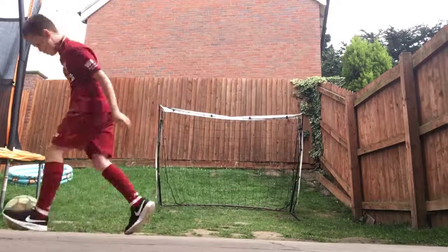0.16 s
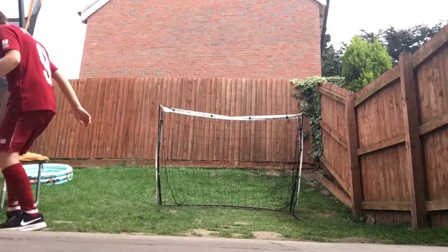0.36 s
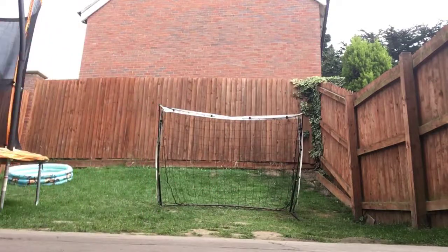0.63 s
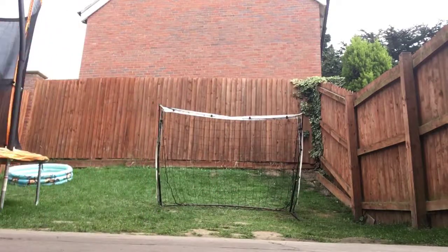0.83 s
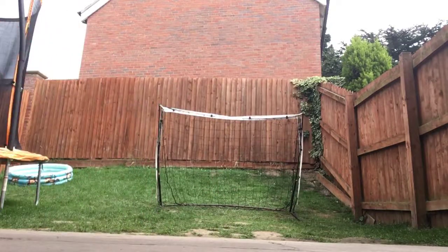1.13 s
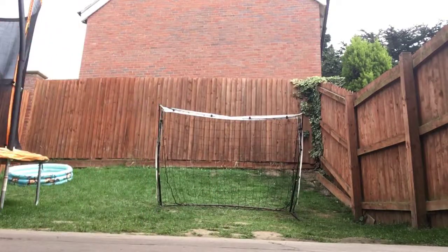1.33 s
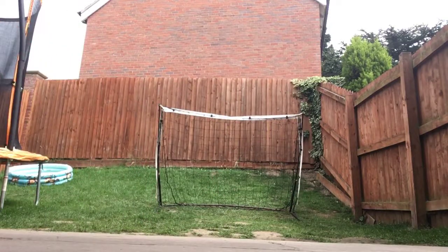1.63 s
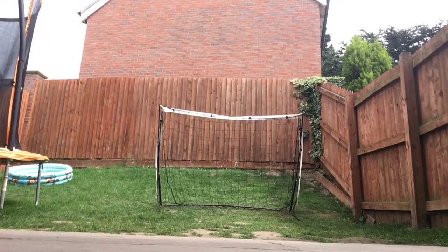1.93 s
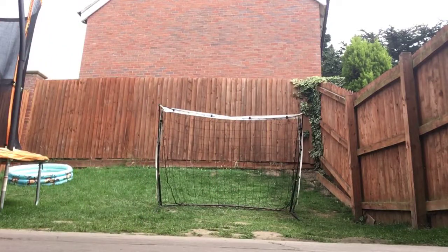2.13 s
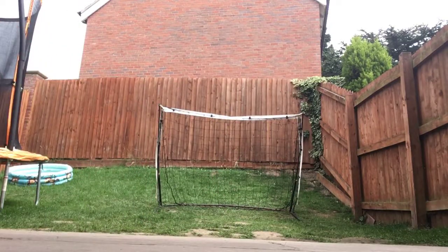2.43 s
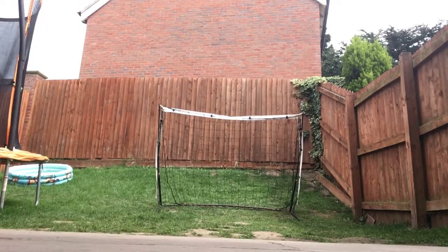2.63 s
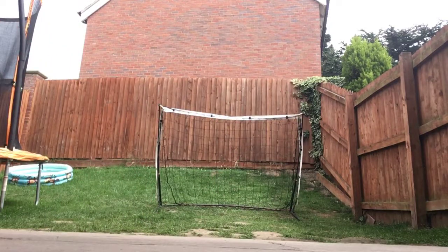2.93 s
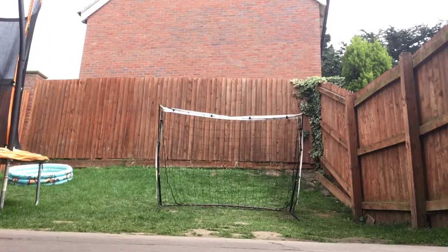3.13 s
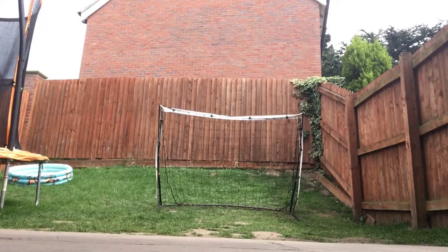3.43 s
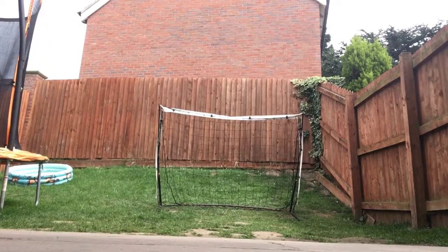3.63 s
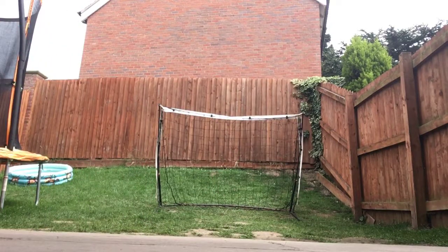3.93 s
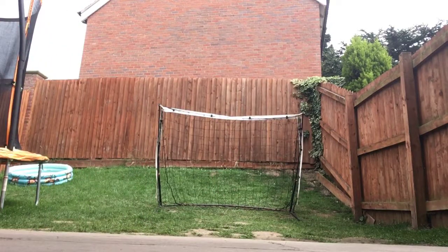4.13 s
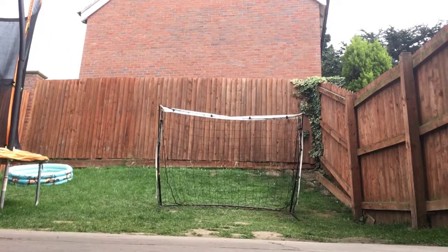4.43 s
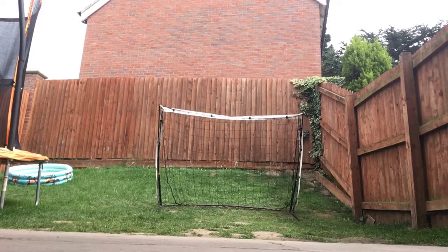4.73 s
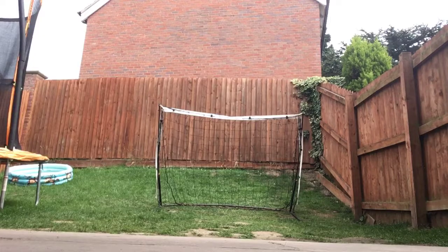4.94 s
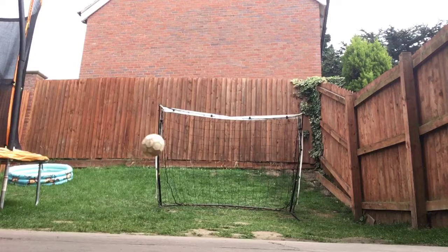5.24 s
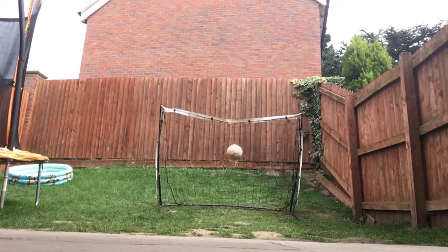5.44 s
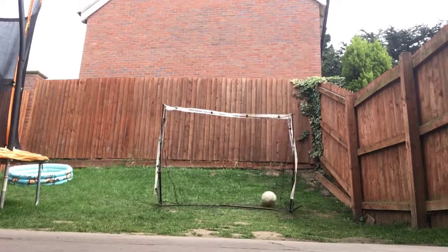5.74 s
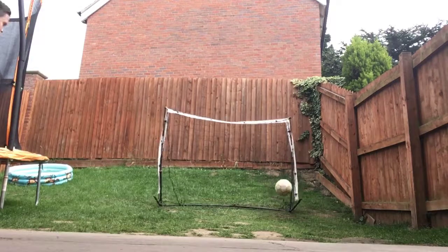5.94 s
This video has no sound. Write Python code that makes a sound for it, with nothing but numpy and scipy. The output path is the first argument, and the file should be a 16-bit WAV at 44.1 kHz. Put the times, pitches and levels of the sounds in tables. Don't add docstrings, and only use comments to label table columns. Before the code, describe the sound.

In a small walled garden a football is touched and kicked in quick thuds, the hardest booming off a wooden fence with rattling boards and a brief metallic jitter. Softer touches follow, then shoes scuff grass and grit while a small bird chips over low far traffic. Finally a sharp, punchy shot cracks out, and the ball hits a net that rustles and settles. One fixed microphone, close to the contacts, short outdoor echoes.

```python
import sys
import numpy as np
from scipy import signal
from scipy.io import wavfile

SR = 44100
rng = np.random.default_rng(int(sys.argv[2]) if len(sys.argv) > 2 else 0)


def pcm_store(signal):
    levels = np.round(np.clip(np.atleast_2d(signal), -1, 1) * 32767)
    wavfile.write(sys.argv[1], SR, levels.astype(np.int16).T)


def level_to_linear(level):
    exponent = np.asarray(level, float) / 20
    return 10 ** exponent


N = 267772

EDGES_HZ = 32 * 2 ** np.arange(0, 9.1, 1 / 3)
CENTRES_HZ = np.sqrt(EDGES_HZ[1:] * EDGES_HZ[:-1])

# start [s], peak level [dB], dent frequency [Hz], ball ring [dB], wall tail [dB].
SLAPS = [(0.5071, -26, 800, 0, 3), (0.5097, -19, 900, 0, -6.5), (.712, -22, 780, -6, -16),
         (.868, -26, 600, 0, -14), (0.9151, -2.5, 880, -10, -10), (.9195, -15, 503, -9, -7),
         (1.3022, -18.5, 770, 5, -11), (1.310, -23, 690, 3, -8), (1.3605, -24, 600, -8, -6),
         (1.8365, -27, 815, 3.5, 2), (5.5205, -20, 720, 2, -12)]
# start [s], peak level [dB], dent frequency [Hz], ball ring [dB], wall tail [dB].
CUSHIONED = [
    (0.6437, -14.5, 560, 10.5, -12),
    (0.6483, -18.5, 484, -4, -8.5),
    (1.7646, -25.5, 514, 2, 4.5),
    (1.7692, -30.5, 464, 7, -1.5),
    (4.9657, -28.5, 384, -2, -3.5),
    (5.122, -26.5, 690, 1, 0),
    (5.1389, -1.5, 570, -11, -10),
    (5.149, -16, 546, -2, -30),
    (5.1583, -18, 480, 2, -6),
]
# start [s], peak level [dB], dent frequency [Hz], ball ring [dB], wall tail [dB].
LANDINGS = [
    (5.864, -29, 705, 4, 0.5),
    (5.8736, -15, 530, -16, -12),
    (5.995, -39.5, 470, 12, -22),
]
# start [s], peak level [dB], dent frequency [Hz].
REBOUNDS = [
    (.932, -15.5, 950),
    (.959, -20, 756),
    (0.993, -23, 576),
    (1.052, -33, 497),
]
# start [s], peak level [dB], dent frequency [Hz].
TAPS = [
    (0.261, -34, 427),
    (.631, -26, 480),
    (2.458, -39, 900),
    (3.539, -36, 800),
    (5.0055, -35, 800),
    (5.015, -41, 694),
    (5.276, -40, 593),
    (5.788, -33, 900),
]


def contact_rows():
    rows = [(*row, 3.5) for row in SLAPS]
    rows += [(*row, -0.1) for row in CUSHIONED]
    rows += [(*row, -1.5) for row in LANDINGS]
    rows += [(*row, -5, 1.5, 3.5) for row in REBOUNDS]
    rows += [(*row, 2, -7, 5.5) for row in TAPS]
    return rows


CONTACTS = contact_rows()


def rms_one(x):
    return x / np.sqrt(np.mean(x ** 2) + 1e-20)


def at_hz(points, hz):
    table_hz, value = np.transpose(points)
    return np.interp(np.log(hz), np.log(table_hz), value)


def band_pass(x, low_hz, high_hz):
    return signal.sosfilt(signal.butter(2, [low_hz, high_hz], "band", fs=SR, output="sos"), x)


def drift(rate_hz):
    r = np.exp(-80 * np.pi * rate_hz / SR)
    white = rng.standard_normal(N // 40 + 2002)
    slow = signal.lfilter([1], [1, -2 * r, r * r], white)[2000:]
    return np.interp(np.arange(N) / 40, np.arange(len(slow)), rms_one(slow))


def bands(grain_db=0.):
    grain = np.minimum(rng.exponential(1, N), 5)
    white = rng.standard_normal((2, N)) * level_to_linear(grain_db * grain)
    white /= white.std()
    return [band_pass(white[k % 2], low_hz, high_hz)
            for k, (low_hz, high_hz) in enumerate(zip(EDGES_HZ, EDGES_HZ[1:]))]


def narrow(hz, width_hz):
    r = np.exp(-np.pi * width_hz / SR)
    section = [1, 0, -1, 1, -2 * r * np.cos(2 * np.pi * hz / SR), r * r]
    return rms_one(signal.sosfilt([section, section], rng.standard_normal(N)))


def narrow_swells(rows):
    out, t = np.zeros(N), np.arange(N) / SR
    for s, hz, width_hz, db, length_s in rows:
        swell = np.exp(-4 * ((t - s) / length_s) ** 2)
        out += level_to_linear(db) * swell * narrow(hz, width_hz)
    return out


def add(track, s, piece):
    i = round(s * SR)
    track[i:i + len(piece)] += piece[:N - i]


def clicks(seconds, sizes):
    train = np.full(N, 1e-18)
    np.add.at(train, np.round(np.asarray(seconds) * SR).astype(int), sizes)
    return train


def ring(train, hz, t60_s):
    r, w = level_to_linear(-60 / (t60_s * SR)), 2 * np.pi * hz / SR
    return signal.lfilter([0, np.sin(w)], [1, -2 * r * np.cos(w), r * r], train)


def air():
    # time [s], level [dB].
    hum = [(0.0, -47), (0.52, -48), (0.73, -45.5), (0.88, -47.5), (1.11, -49), (1.72, -47.5), (1.96, -48.5),
           (2.3, -47.5), (2.99, -48.5), (3.72, -48), (4.85, -48), (5.07, -48), (5.49, -47), (5.8, -46.5),
           (5.97, -45), (6.07, -49.5)]
    # frequency [Hz], level [dB per Hz].
    colour = [(15, -34), (40, 4.5), (64, 1.5), (164, -4.5), (227, -4.5), (457, -12), (970, -9), (2120, -35),
              (3930, -34), (4870, -52.5), (5430, -37), (7300, -44), (9550, -40), (12800, -50.5),
              (15500, -48)]
    together_db = 0.6 * drift(4)
    wash = np.zeros(N)
    for hz, noise in zip(CENTRES_HZ, bands()):
        flicker_db = (0.3 + 150 / (hz + 80)) * drift(6)
        wash += level_to_linear(at_hz(colour, hz) + together_db + flicker_db) * noise
    s, db = np.transpose(hum)
    level_db = np.interp(np.arange(N) / SR, s, db) + 0.5
    return level_to_linear(level_db) * rms_one(wash)


def far_whistles():
    # centre [s], frequency [Hz], width [Hz], peak level [dB], length [s].
    whistles = [(0.09, 5430, 370, -75, 0.35), (0.402, 5400, 250, -77, 0.39), (0.616, 5500, 200, -83, 0.091),
                (1.44, 5640, 300, -77, 0.27), (4.596, 2630, 350, -66, .02), (5.822, 5660, 200, -64, 0.035),
                (5.85, 5580, 150, -69, 0.09), (4.975, 1500, 140, -66, 0.08), (0.21, 1820, 400, -65.5, 0.23),
                (1.628, 1475, 50, -64, 0.11), (4.656, 1690, 97, -68, 0.13), (4.882, 1740, 130, -60.5, 0.13),
                (2.96, 160, 6.2, -54.5, 0.52)]
    return narrow_swells(whistles)


def bird():
    # first chip [s], chips [count], gap [s].
    chatter = [
        (2.465, 4, .07),
        (2.77, 1, 0),
        (2.88, 8, .082),
        (3.685, 4, .085),
        (4.2, 3, .12),
        (4.52, 3, .258),
    ]
    # frequency [Hz], width [Hz], level [dB].
    voice_bands = [(3950, 650, -73), (5450, 600, -76.5)]
    voice = sum(level_to_linear(db) * narrow(hz, width_hz) for hz, width_hz, db in voice_bands)
    out, t = np.zeros(N), np.arange(SR // 20)
    chip_s = 0.019
    swell = np.exp(-4 * ((t - len(t) / 2) / (chip_s * SR)) ** 2)
    for first_s, count, gap_s in chatter:
        for k in range(count):
            i = round((first_s + k * gap_s) * SR) - len(t) // 2
            strength = level_to_linear(2.6 * rng.standard_normal())
            add(out, i / SR, swell * strength * voice[i + t])
    return out


def net():
    # time [s], level [dB].
    shudder = [
        (5.519, -37.5),
        (5.56, -45.5),
        (5.622, -54),
        (5.645, -44.5),
        (5.848, -54.5),
        (5.873, -42.5),
        (5.904, -58),
        (6.058, -68),
        (6.07, -61),
    ]
    # frequency [Hz], level [dB per Hz].
    colour = [(180, -36), (300, -7), (501, 7.5), (767, 13), (1050, -1), (1180, -34), (1420, -52),
              (1780, -3.5), (9000, -28.5), (11700, -63), (19800, -120)]
    rustle = np.zeros(N)
    for hz, noise in zip(CENTRES_HZ, bands(grain_db=5.5)):
        rustle += level_to_linear(at_hz(colour, hz) + 2.8 * drift(26)) * noise
    s, db = np.transpose(shudder)
    level_db = np.interp(np.arange(N) / SR, s, db, left=-120)
    return level_to_linear(level_db) * rms_one(rustle)


def frame():
    # start [s], level [dB].
    touches = [
        (.932, -41),
        (.9345, -47),
        (0.962, -44),
        (.979, -53),
        (.996, -57),
        (1.003, -63),
    ]
    # frequency [Hz], level [dB], t60 [s].
    modes = [(6330, -15, .04), (7160, -21, 0.03), (8350, 0, .02), (8750, -5, .015), (9220, -9, 0.047),
             (9300, -8, 0.057), (11500, -11, 0.02)]
    s, db = np.transpose(touches)
    out = np.zeros(N)
    for hz, mode_db, t60_s in modes:
        spread_db = 3 * rng.standard_normal(len(s))
        sign = np.sign(rng.standard_normal(len(s)))
        out += ring(clicks(s, level_to_linear(db + mode_db + spread_db) * sign), hz, t60_s)
    return out


def grit():
    # centre [s], frequency [Hz], width [Hz], peak level [dB], length [s].
    songs = [
        (2.003, 4150, 420, -49, .012),
        (2.028, 3350, 300, -51, .02),
        (2.02, 2770, 300, -58, 0.074),
        (2.15, 2850, 250, -55.5, 0.019),
        (2.85, 2200, 900, -60.5, 0.085),
    ]
    return narrow_swells(songs)


def scuffs():
    # start [s], peak level [dB], fall [s], brightness [dB per octave].
    drags = [(.03, -56, 0.015, -0.5), (.1, -58, 0.14, -3), (.258, -55, 0.013, 3.5),
             (.706, -38.5, 0.028, -6), (0.851, -41.5, 0.019, 4), (.860, -38.5, 0.021, -8),
             (1.983, -43, 0.045, 0), (2.06, -55, 0.076, -2), (2.123, -48.5, 0.027, 2.5),
             (2.173, -56.5, 0.012, 9), (2.268, -59, 0.012, 2.5), (2.775, -55.5, 0.078, -2.5),
             (2.815, -51.5, 0.064, -2.5), (3.543, -46, 0.037, 0), (4.839, -52.5, 0.045, 0)]
    # start [s], peak level [dB], fall [s], brightness [dB per octave].
    sole_scuffs = [(0.698, -41, 0.024, 9), (.735, -59, 0.29, 0.5), (1.165, -67, 0.044, 8),
                   (1.301, -39.5, 0.021, 4), (1.355, -53, 0.017, 3), (1.43, -61, 0.088, 2),
                   (1.494, -53.5, 0.0065, 1.5), (1.55, -65.5, 0.087, 6), (2.014, -57, 0.023, 5),
                   (3.02, -61, 0.029, -0.5), (3.258, -56, 0.047, -0.5), (4.021, -57.5, 0.008, 17),
                   (4.024, -53, 0.02, 0.5), (4.128, -41.5, 0.0045, 9.5), (4.132, -46, 0.025, 1),
                   (4.224, -56.5, 0.0077, 1.5), (4.96, -58, 0.017, -1), (5.308, -50, 0.041, 0.5)]
    # start [s], peak level [dB], fall [s], brightness [dB per octave].
    strides = [
        (5.1195, -42.5, 0.0045, 9),
        (5.40, -52, 0.024, 1.5),
        (5.423, -53, 0.039, 0),
        (5.456, -53, 0.0073, 1),
    ]
    # start [s], peak level [dB], fall [s].
    cords = [
        (5.595, -50, 0.082),
        (5.687, -45.5, 0.051),
        (5.745, -55, 0.007),
        (5.785, -47, 0.0054),
        (5.816, -51, 0.0078),
        (5.99, -51, 0.027),
        (6.043, -53.5, 0.021),
    ]
    # frequency [Hz], level [dB per Hz].
    friction = [(180, -46), (300, -1.5), (794, -2.5), (1240, -4), (1870, -14.5), (3400, -12.5),
                (4960, -17.5), (6050, -19.5), (9600, -24), (15500, -47)]
    rubs = []
    for rows, rise_share in [(drags, 0.47), (sole_scuffs, 0.17), (strides, 0.58)]:
        rubs += [(s, db, rise_share * fall_s, fall_s, tilt_db) for s, db, fall_s, tilt_db in rows]
    rubs += [(s, db, 0.0052, fall_s, -3.5) for s, db, fall_s in cords]

    layers, t = np.array(bands(grain_db=4)), np.arange(SR // 3) / SR
    octaves = np.log2(np.maximum(CENTRES_HZ, 1500) / 4000)
    out = np.zeros(N)
    for s, db, rise_s, fall_s, tilt_db in rubs:
        rising = np.sin(np.pi / 2 * t / rise_s) ** 2
        falling = np.exp(-(np.maximum(t - rise_s, 0) / fall_s) ** 1.3)
        swell = np.where(t < rise_s, rising, falling)
        chance_db = 1.8 * rng.standard_normal(len(CENTRES_HZ))
        i = round(s * SR)
        sound = level_to_linear(at_hz(friction, CENTRES_HZ) + chance_db + tilt_db * octaves) @ layers[:, i:i + len(t)]
        add(out, s, level_to_linear(db) * rms_one(sound) * swell[:len(sound)])
    return out


def cracks():
    # start [s], peak level [dB], frequency [Hz], fade [s].
    skin = [(0.5067, -34, 2900, 0.003), (.525, -36.5, 1170, 0.011), (.644, -31.5, 1180, 0.0085),
            (0.9156, -21, 1130, 0.0061), (.932, -40, 8600, 0.003), (1.765, -41, 2100, 0.0059),
            (1.835, -46, 2840, 0.012), (5.138, -27, 4400, 0.003), (5.143, -40, 3870, 0.028),
            (5.144, -33.5, 2130, 0.018), (5.1226, -33, 1200, .008), (5.14, -33.5, 6900, 0.0087),
            (5.519, -35, 3720, 0.0068), (0.505, -42, 960, .006)]
    # start [s], peak level [dB], frequency [Hz].
    ticks = [(0.51, -39, 6760), (.515, -53, 6000), (.630, -55, 3500), (0.644, -47, 4000),
             (.9145, -50, 2800), (.959, -35, 3000), (.962, -52, 8500), (0.995, -37, 2500),
             (.996, -57, 8000), (1.041, -54, 7000), (.939, -45, 3000), (.950, -45, 3500), (.972, -46, 3000),
             (1.003, -50, 5000), (1.015, -52, 5500), (1.020, -55, 5000), (1.030, -51, 4000),
             (1.059, -56, 4500), (1.990, -43, 2900), (2.001, -47, 4200), (2.030, -36, 3400),
             (2.138, -47, 2900), (2.1765, -54, 4370), (1.052, -43, 2480), (1.09, -57, 5000),
             (1.133, -54, 4060), (1.303, -27.5, 9300), (1.359, -43.5, 7000), (4.020, -44, 11000),
             (4.129, -52, 4500), (5.786, -41, 1500), (5.8735, -57, 3000), (5.873, -44, 11000)]
    snaps = [(s, db, hz, 0.34 * hz, fade_s) for s, db, hz, fade_s in skin]
    snaps += [(s, db, hz, 0.56 * hz, 0.00087) for s, db, hz in ticks]
    out, t = np.zeros(N), np.arange(SR // 8) / SR
    for s, db, hz, width_hz, fade_s in snaps:
        low_hz, high_hz = np.clip([hz - width_hz / 2, hz + width_hz / 2], 200, 18000)
        burst = band_pass(rng.standard_normal(len(t)) * np.exp(-t / fade_s), low_hz, high_hz)
        add(out, s, level_to_linear(db) * burst / np.abs(burst).max())
    return out


def rings():
    # start [s], peak level [dB], frequency [Hz], t60 [s].
    modes = [(0.5066, -17, 2900, 0.007), (0.5088, -20.5, 2440, .009), (0.5073, -14.5, 1000, 0.03),
             (.512, -43.5, 1920, .09), (.516, -29, 560, .08), (.644, -29, 378, 0.12),
             (0.9164, -20, 1222, 0.043), (.9165, -15, 315, 0.035), (.958, -21.5, 273, 0.29),
             (0.959, -21.5, 148.6, 0.41), (.962, -29, 438, 0.19), (.975, -36, 610, 0.12),
             (1.766, -26.5, 261, .1), (1.768, -34, 426, .1), (1.775, -37, 600, .12), (1.823, -25, 188, .08),
             (1.362, -32, 680, 0.09), (1.311, -31, 740, .07), (5.522, -28, 720, .1), (5.70, -37, 760, .06),
             (5.884, -27.5, 149, .12), (5.8746, -27, 1000, .014), (5.7873, -34, 1000, .03),
             (5.0055, -37, 900, .025), (5.175, -26.5, 209, .25), (5.208, -33, 622, .12),
             (5.232, -34.5, 446, .12), (5.5195, -39, 2300, .02), (0.507, -27, 311, 0.07),
             (.9315, -30, 2310, .015), (.9495, -35, 2000, .015), (0.9583, -29, 1780, .02),
             (0.9937, -36, 2600, .015), (5.876, -29, 302, .08), (5.1378, -9.5, 3800, .0055),
             (5.1387, -19, 3300, .007), (5.139, -17, 1120, .018), (5.150, -28, 410, 0.12),
             (5.1495, -19, 600, .05), (5.158, -17, 640, 0.04), (5.171, -23, 630, .05),
             (5.18, -27, 400, .06), (5.197, -27, 190, .06), (5.21, -26, 170, .05), (5.168, -39, 795, .1),
             (5.198, -35, 592, 0.17), (5.274, -38.5, 653, .06)]
    out, t = np.zeros(N), np.arange(SR // 3) / SR
    for s, db, hz, t60_s in modes:
        swell = 1 - np.exp(-t * hz / 0.8)
        add(out, s, level_to_linear(db - 60 * t / t60_s) * swell * np.sin(2 * np.pi * hz * t))
    return out


def fence_boom():
    centre_s, db, hz, length_s = 0.9463, -6, 106, 0.011
    since_s = np.arange(N) / SR - centre_s
    return level_to_linear(db) * np.exp(-(since_s / length_s) ** 2) * np.cos(2 * np.pi * hz * since_s)


def tails():
    # frequency [Hz], level [dB per Hz].
    echo = [(140, -9.5), (230, -3.5), (289, -7.5), (402, -11), (514, -13), (656, -12), (931, -22.5),
            (1210, -22.5), (1490, -60), (1870, -34), (4110, -52), (4990, -55), (9520, -65.5), (15000, -83)]
    # frequency [Hz], t60 [s].
    echo_t60 = [(60, 0.72), (200, 0.29), (700, 0.28), (2000, 0.17), (5000, 0.2), (12000, 0.033)]
    s, db, _, _, tail_db, tilt_db = np.transpose(CONTACTS)
    out = np.zeros(N)
    for hz, noise in zip(CENTRES_HZ, bands(grain_db=3)):
        bright_db = tilt_db * np.log2(max(hz, 500) / 600)
        power = clicks(s, level_to_linear(2 * (db + tail_db + 15 + at_hz(echo, hz) + bright_db)))
        decay = level_to_linear(-120 / (at_hz(echo_t60, hz) * SR))
        build = np.exp(-1 / (SR * (0.0012 + 0.15 / hz)))
        decaying = signal.lfilter([1], [1, -decay], power)
        out += noise * np.sqrt(signal.lfilter([1 - build], [1, -build], decaying))
    return out


def slaps():
    # frequency [Hz], level [dB], t60 [s].
    ball = [(224, -1.5, 0.055), (314, -15, 0.076), (510, -40, 0.017), (558, -39, 0.015),
            (596, -16.5, 0.066), (1000, -8, 0.018), (1170, -15, 0.082), (1870, -86, 0.025),
            (3000, -41, 0.15)]
    out, t = np.zeros(N), np.arange(SR // 40) / SR
    for s, db, dent_hz, *_ in CONTACTS:
        cycles = t * dent_hz
        add(out, s, -level_to_linear(db + 12) * np.sin(2 * np.pi * cycles) * cycles * np.exp(-cycles / 0.5))
    s, db, dent_hz, ring_db = np.transpose(CONTACTS)[:4]
    for hz, mode_db, t60_s in ball:
        mismatch_db = -14 * np.abs(np.log2(hz / dent_hz))
        spread_db = 5.6 * rng.standard_normal(len(s))
        sign = np.sign(rng.standard_normal(len(s)))
        strength = level_to_linear(db + ring_db + mode_db + mismatch_db - 0.5 + spread_db) * sign
        out += ring(clicks(s + 0.00062, strength), hz, t60_s)
    return out


def pushes():
    # start [s], peak level [dB], frequency [Hz], length [s].
    soft = [(.001, -33.5, 155, 0.0024), (0.412, -47, 92, 0.014), (0.506, -12.5, 95.3, 0.012),
            (.629, -26, 170, .003), (0.659, -27, 69, 0.0088), (0.9646, -21, 100, 0.03),
            (1.1, -37, 108, 0.12), (1.17, -40, 70, .05), (1.7675, -20.5, 135, 0.0077),
            (1.798, -28, 95, 0.0042), (1.801, -18.5, 95.5, 0.0062), (1.816, -24, 105, 0.02),
            (2.28, -35, 93.5, 0.0087), (2.46, -31, 80, 0.0083), (4.549, -37.5, 215, 0.013),
            (4.965, -33.5, 208, 0.0081), (5.192, -40, 95, 0.025)]
    # start [s], peak level [dB], first [Hz], last [Hz], length [s].
    boots = [(.643, -26, 173, 90, .015), (1.300, -24, 76, 55.7, 0.018), (1.3715, -27.5, 78, 25, 0.02),
             (.9135, -17, 100, 70, .011), (.9257, -6, 47, 34, .0126), (.9873, -17, 70, 77, .0147),
             (1.0333, -26, 140, 70, .035), (1.3599, -24, 200, 30, .0055), (5.8623, -22, 97, 36, .0227),
             (5.1373, -5, 108, 40, .0144), (5.1615, -17, 75, 70, .007)]
    # rise in cycles, rumble in dB against the push
    rows = [(s, db, hz, 0.805 * hz, length_s, 0.29, -19) for s, db, hz, length_s in soft]
    rows += [(*row, 0.22, -31) for row in boots]
    lag_s, rumble_fade_s = 0.002, 0.079
    out, t = np.zeros(N), np.arange(SR // 3) / SR
    rumble = rms_one(band_pass(rng.standard_normal(N), 55, 150))
    for s, db, first_hz, last_hz, length_s, rise_cycles, rumble_db in rows:
        hz = last_hz + (first_hz - last_hz) * np.exp(-t / length_s)
        swell = (1 - np.exp(-t * first_hz / rise_cycles)) * np.exp(-0.5 * (t / length_s) ** 2)
        phase = 2 * np.pi * np.cumsum(hz) / SR
        swing = swell / swell.max() * (np.sin(phase) - 0.14 * np.sin(3 * phase))
        at = np.minimum(round(s * SR) + np.arange(len(t)), N - 1)
        after = (1 - np.exp(-(t / length_s) ** 2)) * np.exp(-t / rumble_fade_s) * rumble[at]
        add(out, s + lag_s, level_to_linear(db) * (swing + level_to_linear(rumble_db) * after))
    return out


def scene():
    background = air() + far_whistles() + bird()
    rubbing = net() + frame() + grit() + scuffs()
    contacts = cracks() + rings() + fence_boom() + tails() + slaps() + pushes()
    return (background + rubbing + contacts)[None]


def roll_off(x):
    return signal.sosfilt(signal.butter(12, 15960, fs=SR, output="sos"), x)


def record(dry):
    thin = signal.sosfilt(signal.butter(4, 35, "high", fs=SR, output="sos"), dry)
    rounded = 1.6 * np.tanh(thin / 1.6)
    cut = signal.sosfilt(signal.cheby2(12, 70, 16200, fs=SR, output="sos"), rounded)
    return roll_off(cut)


dry = scene()
out = record(dry)
pcm_store(out)
```